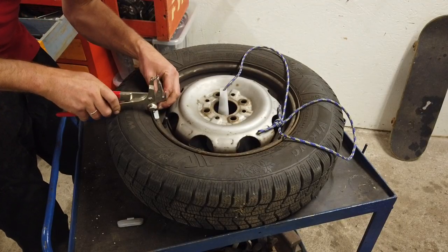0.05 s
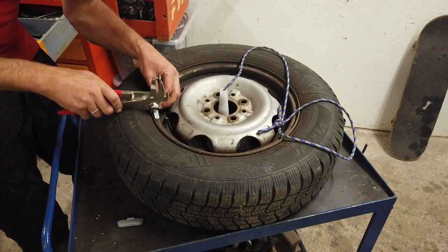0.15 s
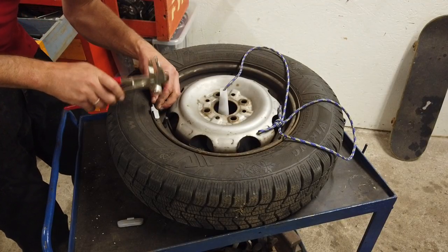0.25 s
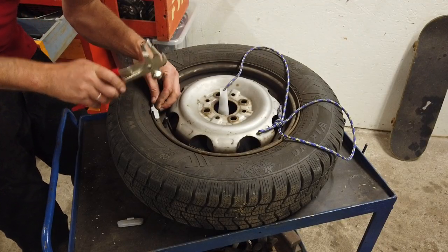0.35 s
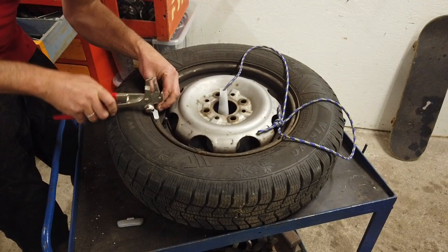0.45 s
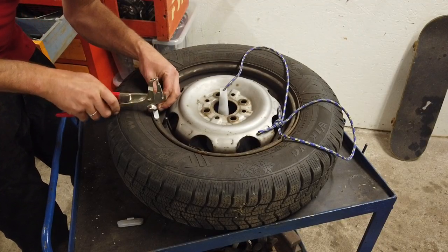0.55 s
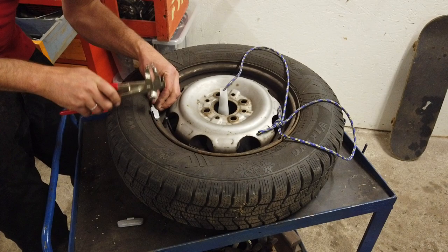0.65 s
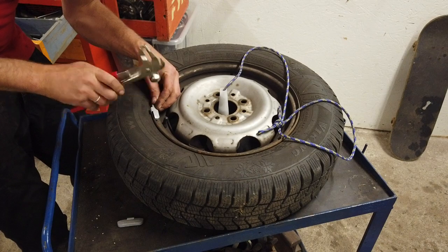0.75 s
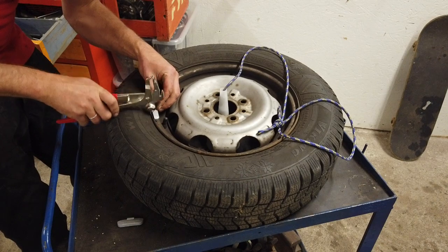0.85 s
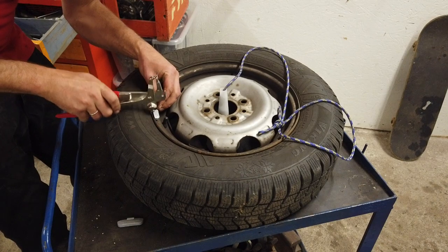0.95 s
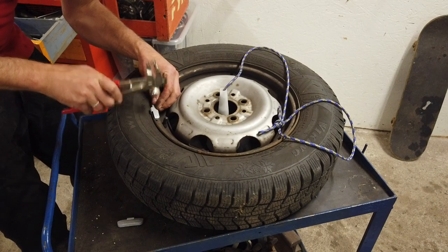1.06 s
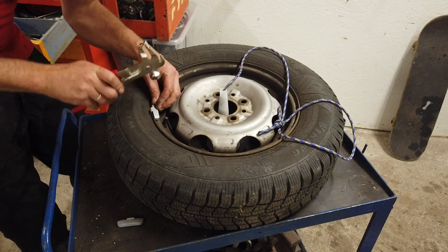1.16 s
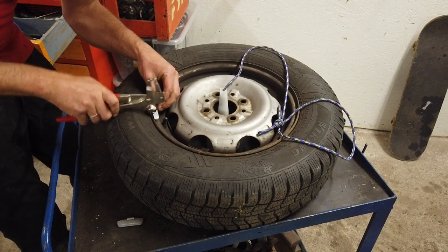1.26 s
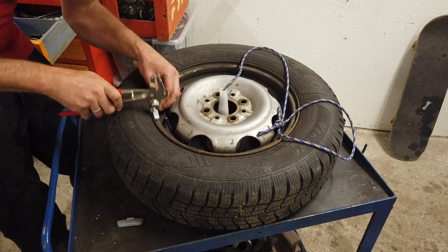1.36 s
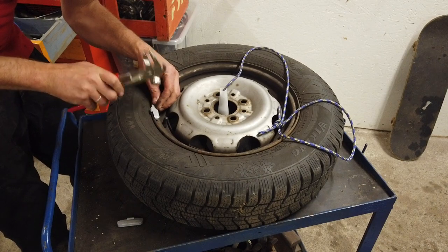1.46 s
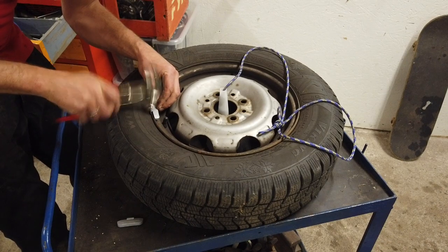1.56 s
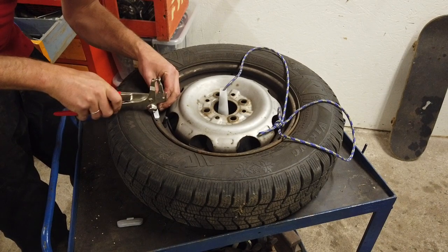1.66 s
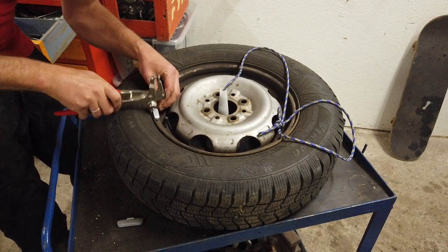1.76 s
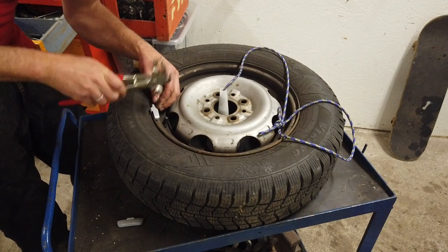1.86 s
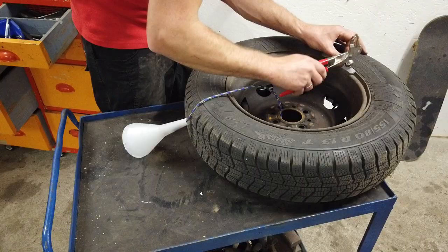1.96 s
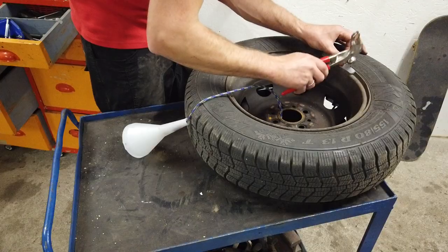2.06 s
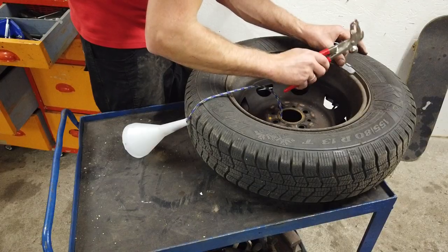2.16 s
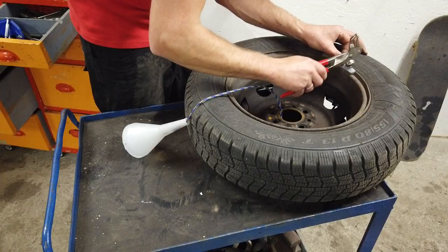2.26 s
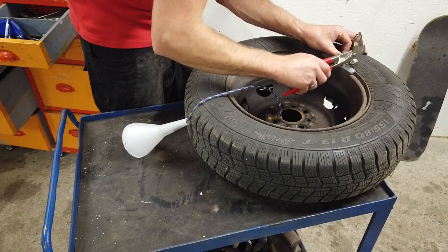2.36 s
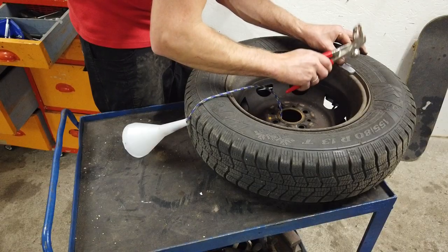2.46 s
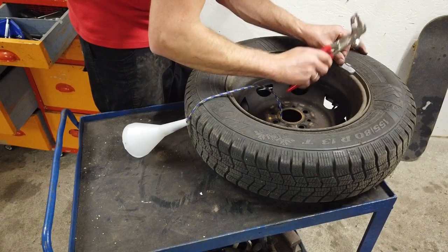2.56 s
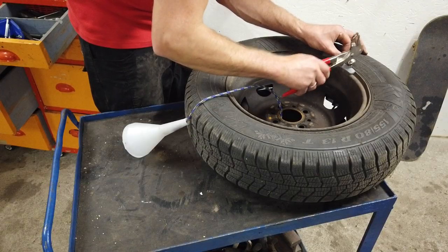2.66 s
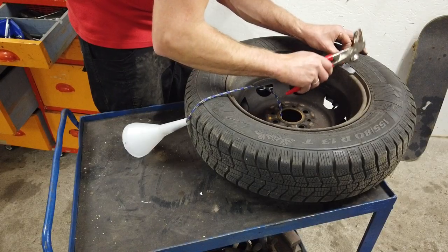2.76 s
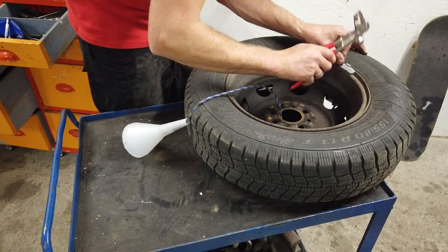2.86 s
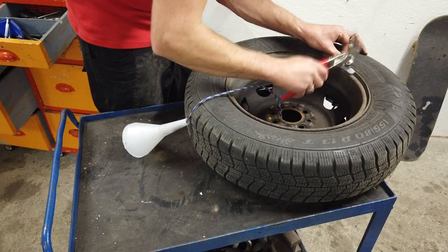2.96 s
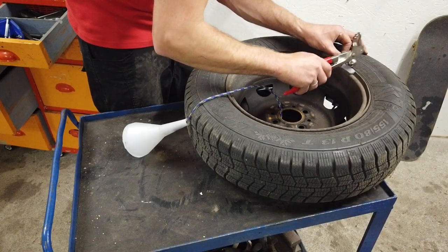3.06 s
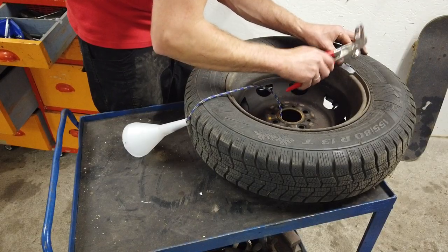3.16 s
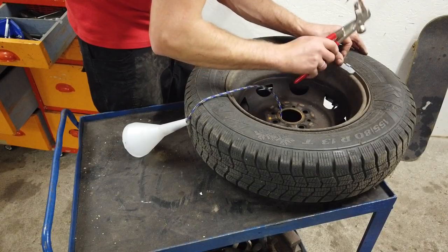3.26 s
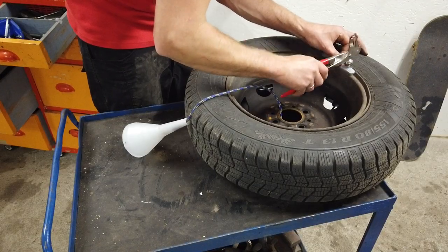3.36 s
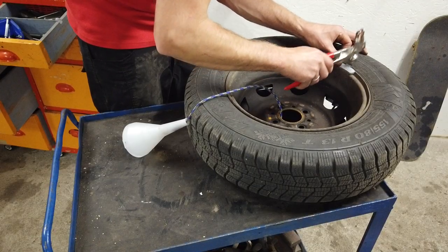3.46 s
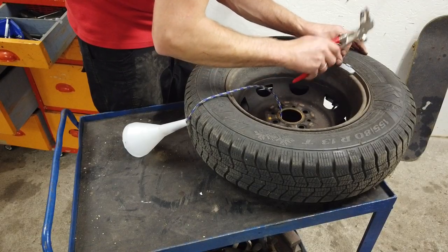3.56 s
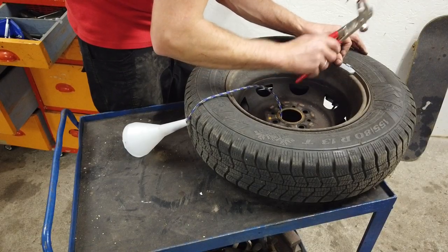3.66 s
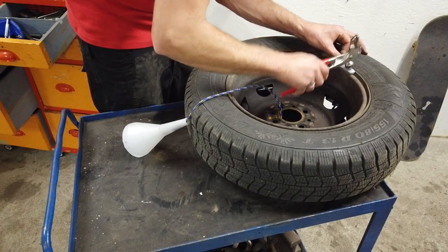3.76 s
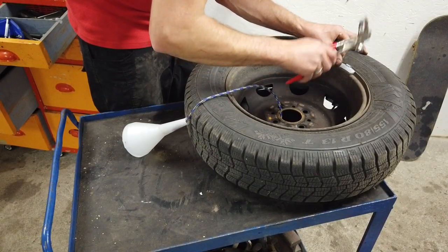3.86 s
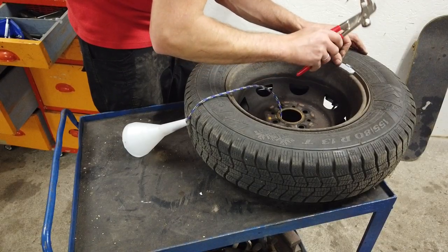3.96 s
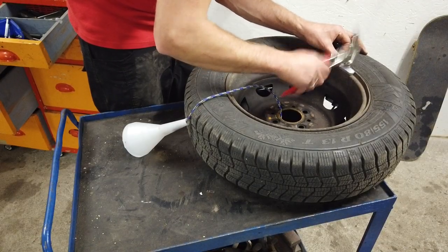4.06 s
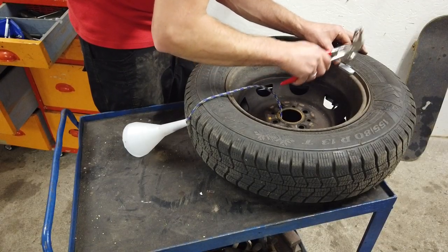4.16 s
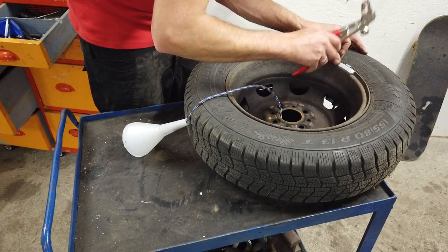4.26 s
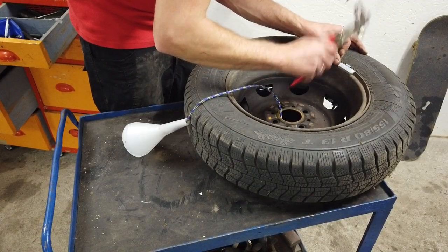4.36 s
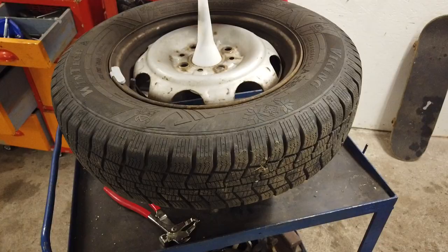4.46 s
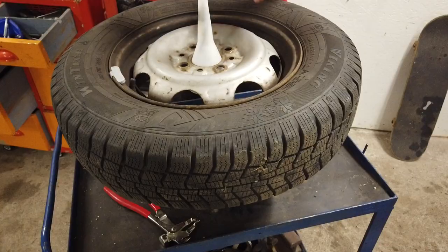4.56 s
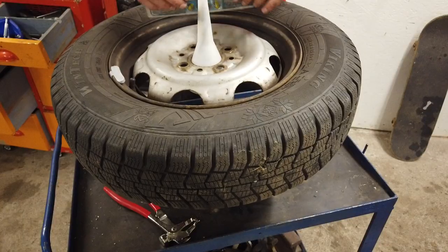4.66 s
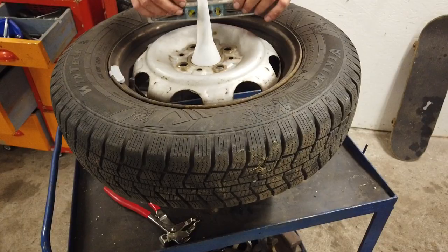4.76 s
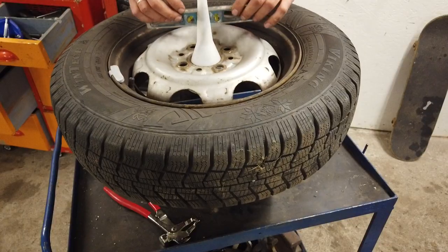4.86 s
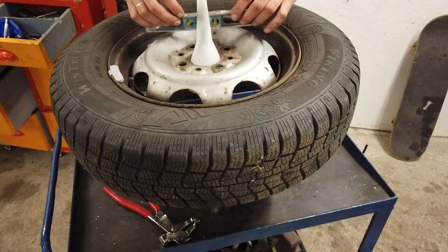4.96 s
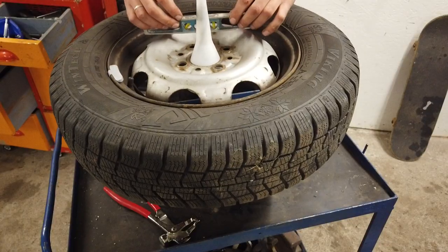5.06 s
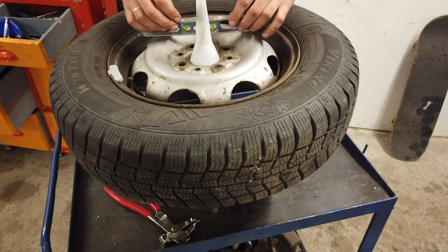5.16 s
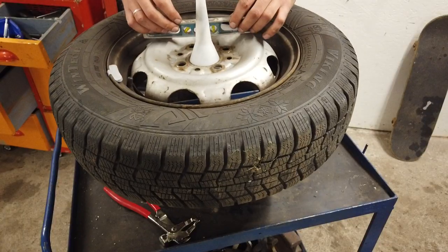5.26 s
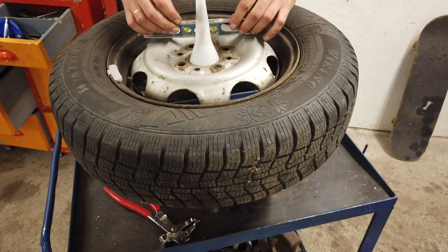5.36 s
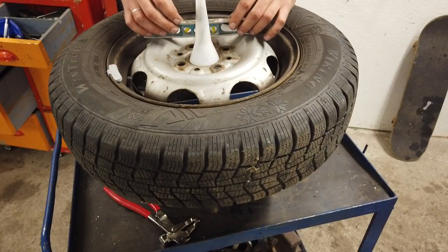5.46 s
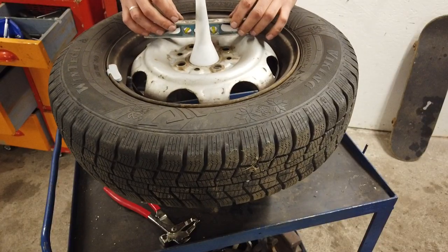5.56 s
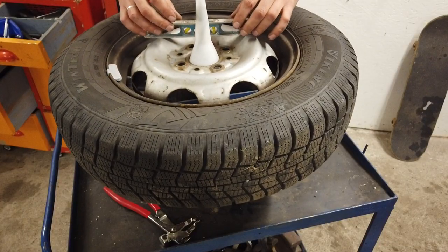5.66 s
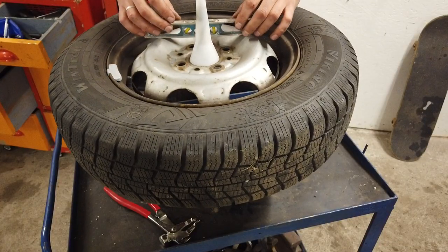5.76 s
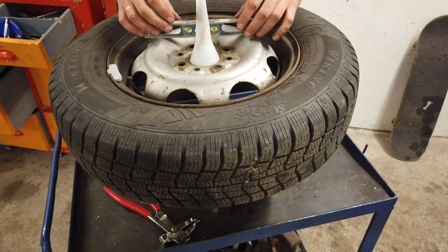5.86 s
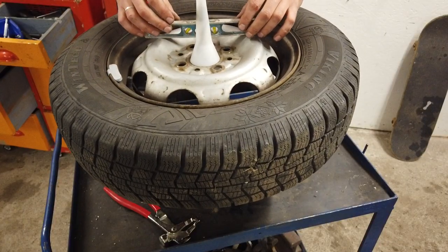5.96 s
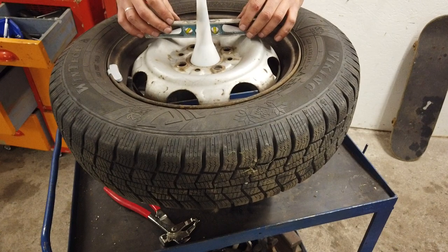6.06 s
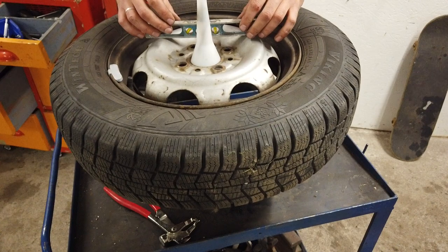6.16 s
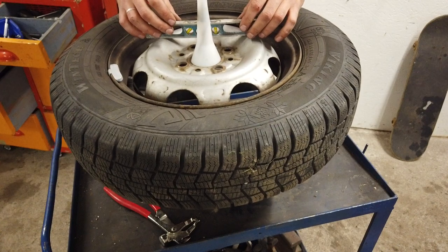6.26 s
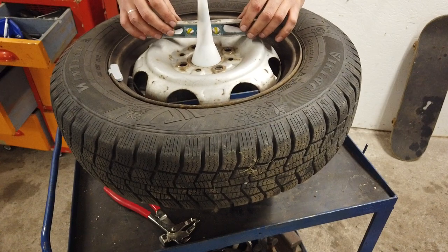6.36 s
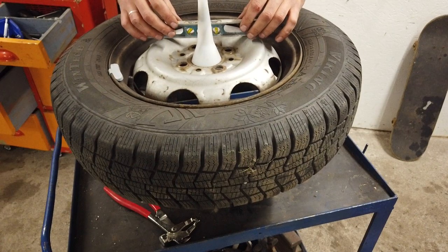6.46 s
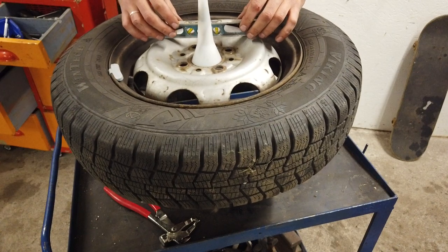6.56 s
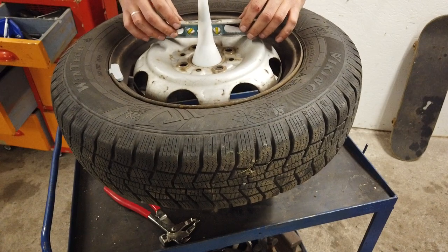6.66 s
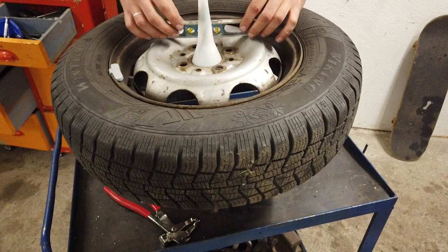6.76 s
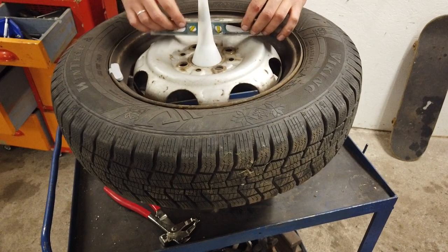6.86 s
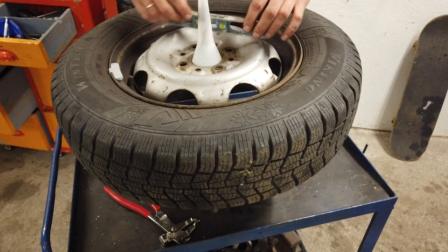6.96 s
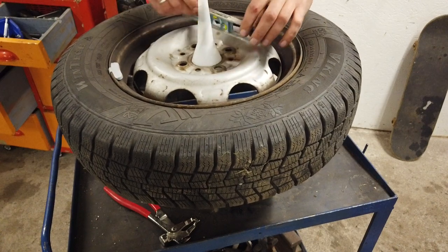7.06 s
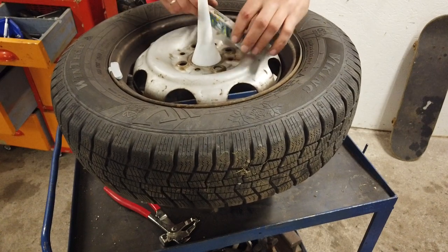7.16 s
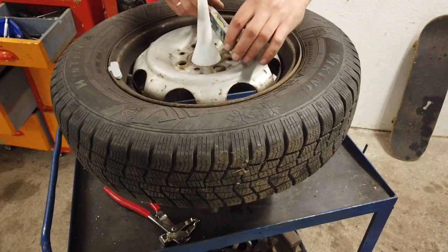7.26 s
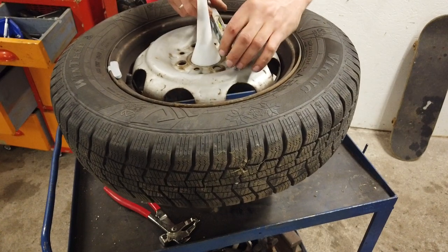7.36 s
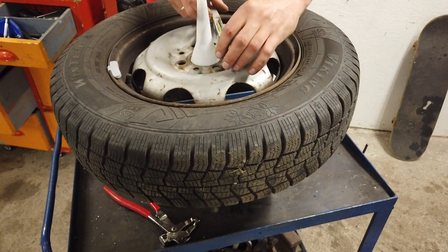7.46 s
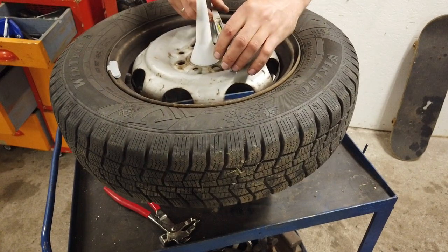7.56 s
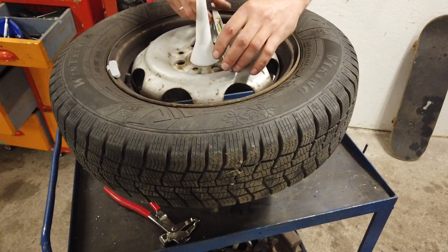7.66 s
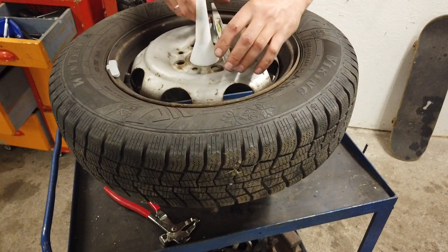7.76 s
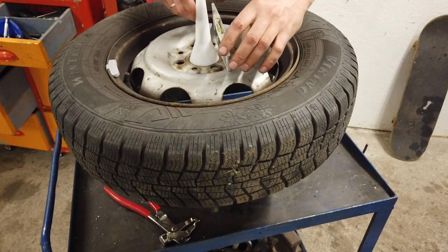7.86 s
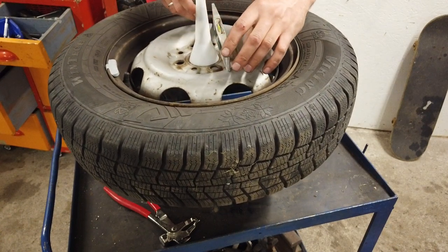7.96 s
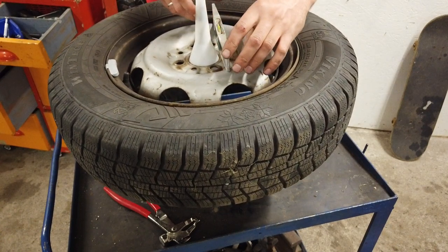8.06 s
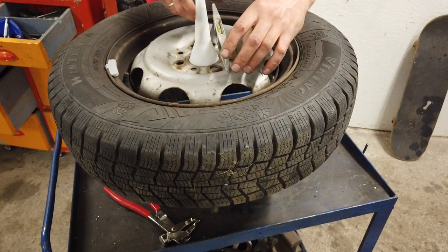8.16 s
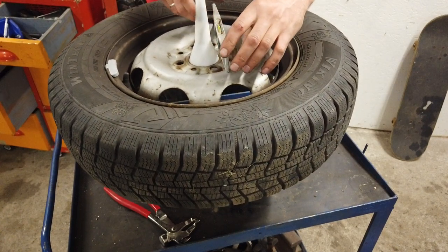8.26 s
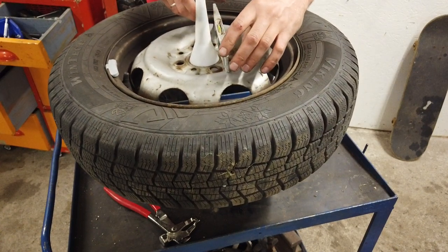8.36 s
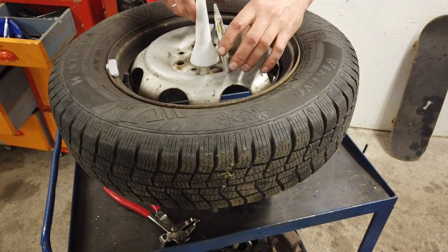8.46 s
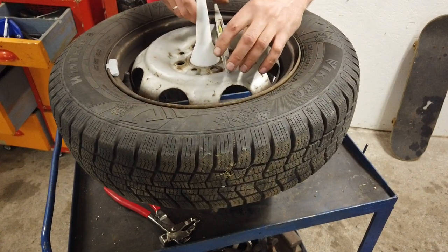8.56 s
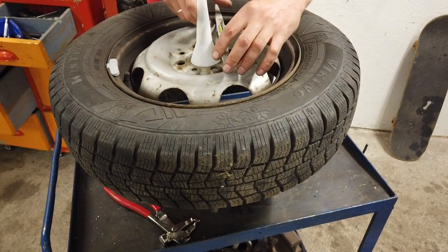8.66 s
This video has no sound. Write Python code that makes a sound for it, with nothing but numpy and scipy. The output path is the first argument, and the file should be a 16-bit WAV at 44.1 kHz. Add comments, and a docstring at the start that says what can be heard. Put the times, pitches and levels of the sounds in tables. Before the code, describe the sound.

Close recording in a small, briefly echoing garage with faint hiss and hum. From 0 to 2 seconds a plier hammer hits a weight on a steel wheel at about 0.15, 0.55, 0.95, 1.35 and 1.7: loud, hard clanks, slightly crushed by their loudness, with clattering rebounds and a short dull ring. A tiny scrape follows before the abrupt cut at 2.0. The wheel is now turned over; seven more blows come about every 0.35 seconds until 4.2, the first weaker, later ones strong, with a lower, boxier body. Another cut at 4.45 drops to quiet: soft brushing, a dull tap at 4.8 and thin high singing as a metal level slides. It clacks sharply in a quick cluster at 5.4 to 5.5, with dull settling bumps until 5.85. Near silence follows, a faint scuff at 7.0, then a double knock at 7.6 to 7.7 and only room tone.

```python
"""Balancing a steel wheel

In a garage, a plier hammer drives balance weights onto a wheel lying on a sheet-metal cart, then onto the wheel
turned over; last, a spirit level slides, is laid down and knocks on the hub. Three scenes are cut together.
Contacts are sums of decaying modes, dense clatter, a steel snap and a reverberant tail; rubbing is coloured noise
under swells; room tone is noise with hums. A close microphone softly clips the loudest blows."""
import sys
import numpy as np
from scipy import signal
from scipy.fft import rfft, irfft, next_fast_len
from scipy.io import wavfile
from scipy.ndimage import map_coordinates

SR = 44100
rng = np.random.default_rng(int(sys.argv[2]) if len(sys.argv) > 2 else 0)


def dump_mix(stems):
    """Bounce the given channels to the path in sys.argv[1] as a 16-bit WAV at rate SR."""
    frames = np.atleast_2d(stems).T  # one column per channel
    limited = np.clip(frames, -1, 1)  # hard clip at full scale
    pcm = np.round(limited * 32767).astype(np.int16)
    wavfile.write(sys.argv[1], SR, pcm)


N = 383621  # samples

# Boundaries between the three scenes: time_s
SCENE_CUTS = [1.971, 4.445]

# Room tone, relative spectrum: freq_hz, level_db
AIR_SPECTRUM = [(12, -36), (20, -15.5), (121, -10), (152, -5), (226, -14.5), (299, -7), (364, -12.5),
                (496, -11), (605, -13), (1370, -18), (1530, -16), (9000, -21), (13000, -27.5),
                (15000, -29.5), (16800, -36.5)]
# Steady hums, before a trim and a slow wavering: pitch_hz, level_db
HUM_TONES = [(100, -76), (151, -75), (202, -84.5), (300, -78.5)]
# Reverberation time of the garage: freq_hz, t60_s
GARAGE_DECAY = [(60, .6), (200, .42), (500, .37), (1100, .27), (3000, .285), (7000, .29), (12000, .235),
                (16000, .19)]
# Colour of the garage's answer: freq_hz, level_db
WALL_COLOUR = [(100, -5), (1000, 2), (3000, -1.5), (6000, -2), (12000, 2.5)]
# Microphone response: freq_hz, gain_db
MIC_RESPONSE = [(20, -8), (100, -1), (9000, -4), (13000, 1), (15600, -1.5), (16200, -19), (17000, -32)]
BAND_LIMIT_HZ = 17000

# Dull taps and clunks of the rocking wheel: start_s, level_db, pitch_hz, t60_s, tick_db
DULL_KNOCKS = [(1.62, -40.5, 770, .015, -21), (4.549, -50.5, 1160, 0.032, -15),
               (4.77, -28.5, 913, 0.013, -43), (5.575, -40, 546, 0.059, -30), (5.64, -40, 506, 0.039, -35),
               (5.811, -32, 1430, 0.017, -16), (5.814, -37.5, 309, 0.073, -30),
               (6.598, -55, 3570, .015, -9)]

# Low rumbles: a blow dying away, then the wheel rocking and settling:
# start_s, attack_s, hold_s, release_s, level_db
LOW_RUMBLES = [(1.95, .03, 0.094, .02, -56), (4.43, 0.021, 0.11, 0.038, -64.5),
               (5.54, 0.029, 0.27, 0.084, -54.5)]
# Swells of a low hum: start_s, attack_s, hold_s, release_s, level_db
LOW_HUMS = [(5.79, 0.018, .015, 0.11, -56), (5.83, 0.14, 0.014, 0.085, -49.5)]
# Hands and tools brushing over tyre and rim: start_s, attack_s, hold_s, release_s, level_db
BRUSH_STROKES = [(-.05, 0.027, 0.18, .03, -60), (4.42, 0.024, 0.033, 0.13, -61.5),
                 (4.53, 0.0426, 0.042, 0.15, -43), (6.57, 0.023, 0.0065, .12, -64.5)]
# Relative spectrum of brushing: freq_hz, level_db
BRUSH_SPECTRUM = [(59, -49), (100, -6.5), (320, 7), (497, -5), (527, -1.5), (1460, -4), (1590, -6.5),
                  (1980, -4.5), (3260, -0.5), (12000, -25), (15600, -65.5), (22000, -120)]
# The weight shifted along the rim: start_s, attack_s, hold_s, release_s, level_db
RIM_SCRAPES = [(1.605, .012, 0.011, 0.026, -52.5), (1.65, 0.014, 0.048, .01, -53.5),
               (1.96, 0.012, 0.1, .015, -54)]
# Rim resonances under a scrape: pitch_hz, width_hz, level_db
RIM_RESONANCES = [(800, 300, -0.5), (1600, 150, 0.5), (2000, 400, 0.5), (2500, 300, -2), (3100, 200, -5.5),
                  (3700, 250, -3), (4800, 300, -5.5)]
# The sliding level sings: start_s, attack_s, hold_s, release_s, low_line_db, upper_lines_db
SLIDE_SONGS = [(4.43, 0.019, 0.052, .08, -68, -62), (4.58, 0.03, 0.034, 0.18, -56, -63),
               (4.785, 0.019, 0.078, 0.076, -50.5, -61.5), (7.1, .04, 0.24, .12, -72, -88),
               (7.1, 0.04, .04, .1, -87.5, -67.5)]
# Upper lines of the singing: pitch_hz, width_hz, level_db
UPPER_LINES = [(6300, 140, 0), (6750, 120, -4), (8050, 200, -11)]
SWELL_DB = 30  # how far under its top a swell starts and ends

# Level against the hub: start_s, level_db, thud_db, bright_db, snap_db
HUB_KNOCKS = [(5.413, -16.5, -6.5, -12, -16), (5.468, -14, -1, 4, 11.5), (5.501, -29, -17, 1, -12),
              (7.602, -27, -2.5, -17, -30), (7.689, -10, -7, -11, -18), (7.693, -16.5, -6, -4.5, -2)]
# Modes of level and hub: pitch_hz, level_db, t60_s
LEVEL_MODES = [(342, -15, 0.072), (431.5, -6.5, 0.033), (542, -19.5, 0.065), (990, -31, 0.1),
               (1174, -11.5, 0.072), (1247, -8.5, 0.033), (1374, -21, 0.11), (1777, 0.5, 0.06),
               (2008, -9, 0.03), (2346, -17, 0.061), (2773, -13, 0.058), (3770, -51, 0.027),
               (5010, -33, 0.45), (5190, -8, 0.04), (6580, -27, 0.059), (7180, -31, 0.11)]
# Dense clatter of a knock, relative spectrum: freq_hz, level_db
KNOCK_SPECTRUM = [(60, -52), (300, -11), (1200, -4), (2500, -5.5), (5200, -1), (9000, -51), (16000, -29)]
# The level scuffs over the hub: start_s, attack_s, hold_s, release_s, low_modes_db, high_modes_db
HUB_SCUFFS = [(6.955, 0.036, .004, 0.042, -40, -54.5)]

# Hammer blows: start_s, level_db, thud_db (tyre and cart), bright_db (before dulling), snap_db
HAMMER_BLOWS = [(-.25, 2, 2, -5, 4), (.139, -4.5, 3, 6.5, 10), (.544, 2.5, -0.5, 1, -0.5),
                (.97, 1, -3, 1.5, 0.5), (1.349, 4.5, -1.5, 1.5, -2), (1.701, 2.5, -4, -0.5, -1.5),
                (2.093, -13, 6.5, 13, 13.5), (2.368, -6.5, 3.5, 11.5, 3.5), (2.741, -6, 0, 3.5, 17.5),
                (3.1, 1, -4.5, 4, 7.5), (3.482, 0.5, -3.5, 0, -16), (3.865, 1.5, -8, 0.5, 0),
                (4.204, 3, -9.5, 1, -0.5)]
# Tool and weight land again after a blow: start_s, level_db
HAMMER_REBOUNDS = [(.148, -4), (.158, -7), (.176, -10.5), (.186, -12.5), (0.211, -19), (.559, 0.5),
                   (.58, -13.5), (.618, -12.5), (.99, -4), (.998, -11.5), (1.009, -12.5), (1.365, -6),
                   (1.373, -4.5), (1.397, -10.5), (1.413, -9), (1.716, -9.5), (1.721, 2), (2.11, -16),
                   (2.121, -11), (2.377, -13.5), (2.442, -18), (2.754, -0.5), (2.818, -12.5), (3.175, -9.5),
                   (3.189, -18), (3.22, -29.5), (3.493, -7), (3.519, -8.5), (3.548, -14), (3.877, 1),
                   (3.919, -10), (4.244, -8.5), (4.257, -10.5)]
REBOUND_THUD_DB, REBOUND_BRIGHT_DB, REBOUND_SNAP_DB = -4, 1, -9.5  # brightness before dulling
BLOW_RISE_S, REBOUND_RISE_S = .0007, .001
DULLING = .6  # dB of treble lost per dB of weaker contact
# Modes of wheel, cart and tool: pitch_hz, face_up_db, face_down_db, t60_s
WHEEL_MODES = [(58, -38, -24, .6), (199, -16, -14, .35), (260, -8, -2, .3), (302, 0, -14, .22),
               (347, -5, -12, .18), (415, -14, -14, .45), (506, -16, -14, .4), (565, -6, -14, .17),
               (684, -7, -10, .18), (732, -16, -10, .2), (995, -16, -8, .18), (1042, -14, -2, .13),
               (1082, -6, -12, .15), (1131, -8, -16, .15), (1205, -14, -5, .14), (1350, -8, -9, .12),
               (1420, -8, -6, .12), (1616, -12, -14, .13), (1725, -8, -16, .12), (1935, -5, -12, .11),
               (2476, -15, -26, .25), (3208, -28, -20, .2), (4900, -24, -26, .16), (2159, -31, -38, .6),
               (2358, -30, -33, .45), (2756, -32, -34, .42), (3075, -31, -30, .45), (4740, -26, -30, .27),
               (5152, -40, -28, .38), (7900, -38, -30, .22)]
# Dense clatter with the wheel face up, relative spectrum: freq_hz, level_db
FACE_UP_SPECTRUM = [(18, -74.5), (30, -43.5), (130, -38.5), (235, -24), (314, -2.5), (506, -7.5), (694, -8),
                    (814, -22.5), (1380, -5), (1530, -15.5), (1890, -0.5), (2500, -9), (3380, -22.5),
                    (4770, -12.5), (7090, -30), (14100, -52), (16500, -67)]
# Dense clatter with the wheel face down, relative spectrum: freq_hz, level_db
FACE_DOWN_SPECTRUM = [(18, -58.5), (30, -28.5), (130, -20), (185, -18.5), (255, 4), (378, -6.5),
                      (600, -4.5), (752, -11.5), (835, -23), (1030, -5), (1120, -9.5), (1210, -4),
                      (2000, -9), (2280, -11.5), (6210, -16.5), (15200, -54.5), (16500, -67)]
# Decay of the hammer's clatter: freq_hz, t60_s
CLATTER_DECAY = [(60, .15), (300, .06), (1200, 0.027), (2200, 0.015), (4000, .02), (12000, 0.016)]
PAIR_SPLIT = .0026  # spread of paired modes, as a share of their pitch


def amp(db):
    """Decibels are the logarithm of an amplitude ratio."""
    return 10 ** (np.asarray(db) / 20)


def unit(x):
    """Normalisation brings the root-mean-square to 1."""
    return x / np.sqrt(np.mean(x ** 2) + 1e-20)


def along(points, hz):
    """Interpolation of a (freq_hz, value) curve on a logarithmic frequency axis."""
    freq_hz, value = np.transpose(points)
    return np.interp(np.log(hz + 1), np.log(freq_hz + 1), value)


def filtered(x, response):
    """Linear filtering multiplies the spectrum by a response of frequency."""
    size = next_fast_len(N + SR // 2)
    hz = np.fft.rfftfreq(size, 1 / SR)
    return irfft(rfft(x, size) * response(hz), size)[:N]


def noise(colour):
    """White noise shaped by a gain per frequency, at rms 1."""
    return unit(filtered(rng.standard_normal(N), colour))


def wobble(rate_hz):
    """A smooth random curve through independent knots, rate_hz of them a second."""
    knots = rng.standard_normal(int(N * rate_hz / SR) + 4)
    return map_coordinates(knots, [np.arange(N) * rate_hz / SR])


def band(hz, centre_hz, width_hz):
    """A single resonance passes its centre and falls off on both sides."""
    return 1 / np.abs(1 + 2j * (hz - centre_hz) / width_hz)


def resonances(hz, rows):
    """Superposition of squared resonance gains, from rows of pitch_hz, width_hz, level_db."""
    return sum(amp(db) * band(hz, pitch_hz, width_hz) ** 2 for pitch_hz, width_hz, db in rows)


def swells(rows, column=4):
    """Exponential growth and decay of amplitude: straight lines in dB around a hold."""
    t, gain = np.arange(N) / SR, np.zeros(N)
    for row in rows:
        corners_s = row[0] + np.cumsum([0, *row[1:4]])
        shape = np.interp(t, corners_s, [-1, 0, 0, -1], -np.inf, -np.inf)  # silent outside the swell
        gain += amp(row[column] + SWELL_DB * shape)
    return gain


def dying(size, colour_db, decay):
    """Frequency-dependent damping: noise in which each frequency dies at its own speed."""
    hz, t, z = signal.stft(rng.standard_normal(size), SR, nperseg=256)
    fall_db = 60 * t / along(decay, hz)[:, None]
    gain = amp(colour_db(hz)[:, None] - fall_db)
    return signal.istft(z * gain, SR, nperseg=256)[1][:size]


def garage(dry):
    """Reverberation is convolution with a decaying noise tail, drawn anew for every sound."""
    tail = dying(len(dry), lambda hz: along(WALL_COLOUR, hz), GARAGE_DECAY)
    tail = tail / np.linalg.norm(tail)
    return signal.fftconvolve(dry[:len(dry) // 4], tail)[:len(dry)]


def add(track, start_s, sound):
    """Superposition of a sound on a track, cut off at the next scene boundary."""
    end = min([round(c * SR) for c in SCENE_CUTS if c > start_s] + [N])
    start = round(start_s * SR)
    sound = sound[max(-start, 0):end - start]
    track[max(start, 0):][:len(sound)] += sound


def contact(modes, spectrum, decay, thud_db, bright_db, snap_db, ring_db, clatter_db, wet_db,
            beating, scatter_db, rise_s):
    """Impact excitation: modes at new strengths, dense clatter, a steel snap, and the garage's answer."""
    t = np.arange(SR // 2) / SR

    def tilt_db(hz):
        return along([(500, thud_db), (900, 0), (2500, 0.0078), (4000, bright_db)], hz)

    hz, db, t60_s = np.transpose(modes)[:, :, None]
    split, phase, scatter = rng.standard_normal((3, len(hz), 1))
    # round parts have their modes in close pairs, which beat
    beat = 1 + beating * np.sin(2 * np.pi * (PAIR_SPLIT * hz * split * t + phase))
    mode_db = db + tilt_db(hz) + scatter_db * scatter - 60 * t / t60_s
    ring = np.sum(amp(mode_db) * beat * np.sin(2 * np.pi * hz * t), axis=0)
    ring *= 1 - np.exp(-t / rise_s)

    clatter = dying(len(t), lambda f: along(spectrum, f) + tilt_db(f), decay)
    clatter = clatter * np.sin(np.pi / 2 * np.clip(2 * t / rise_s, 0, 1)) ** 2

    burst = amp(snap_db - 60 * t / 0.013) * rng.standard_normal(len(t))
    snap = signal.sosfilt(signal.butter(2, [4000, 6800], "band", fs=SR, output="sos"), burst)

    dry = amp(ring_db) * ring + amp(clatter_db) * clatter + snap
    return dry + amp(wet_db) * garage(dry)


def room_tone():
    """Stationary noise with faint wavering sinusoids, fainter in the two hammering scenes."""
    t = np.arange(N) / SR
    hums = sum(amp(db - 2.5 + 2.5 * wobble(5)) * np.sin(2 * np.pi * hz * t) for hz, db in HUM_TONES)
    air = noise(lambda hz: amp(along(AIR_SPECTRUM, hz)))
    air = amp(-66.5 + 0.48 * wobble(3)) * air
    return (air + hums) * np.where(t < SCENE_CUTS[1], amp(-6.5), 1)


def dull_knocks():
    """Heavy damping: one short mode, roughened by noise, with a tick on top."""
    out, t = np.zeros(N), np.arange(SR // 4) / SR
    for start_s, db, hz, t60_s, tick_db in DULL_KNOCKS:
        roughness = 1 + 0.11 * rng.standard_normal(len(t))
        body = amp(-60 * t / t60_s) * np.sin(2 * np.pi * hz * t) * roughness
        tick = amp(tick_db - 60 * t / 0.019) * rng.standard_normal(len(t))
        knock = body + tick
        add(out, start_s, amp(db) * (knock + amp(-6.5) * garage(knock)))
    return out


def low_rumbles():
    """Low resonance: a band of noise rumbles, and a sinusoid hums with a wandering phase."""
    t = np.arange(N) / SR
    rumble = noise(lambda hz: band(hz, 460, 190) ** 2)
    hum = np.sqrt(2) * np.sin(2 * np.pi * 316 * t + .5 * wobble(42))
    return rumble * swells(LOW_RUMBLES) + hum * swells(LOW_HUMS)


def brushing():
    """Friction on tyre and rim: broad noise made grainy by random modulation."""
    grains = noise(lambda hz: amp(along(BRUSH_SPECTRUM, hz))) * amp(1.7 * wobble(120))
    return unit(grains) * swells(BRUSH_STROKES)


def rim_scrapes():
    """Friction-driven resonance: the shifted weight excites the rim with grainy noise."""
    grains = noise(lambda hz: resonances(hz, RIM_RESONANCES)) * amp(3 * wobble(150))
    return unit(grains) * swells(RIM_SCRAPES)


def singing_level():
    """Rubbing excites thin metal lines: narrow bands of noise that swell and fade."""
    low_line = noise(lambda hz: band(hz, 5003, 45) ** 2)
    upper_lines = noise(lambda hz: resonances(hz, UPPER_LINES))
    return low_line * swells(SLIDE_SONGS) + upper_lines * swells(SLIDE_SONGS, column=5)


def spirit_level():
    """Modal ringing: light knocks ring the aluminium bar briefly; a scuff drives resonances with noise."""
    out = np.zeros(N)
    for start_s, db, thud_db, bright_db, snap_db in HUB_KNOCKS:
        sound = contact(LEVEL_MODES, KNOCK_SPECTRUM, [(300, 0.12), (5000, 0.037)], thud_db, bright_db, snap_db,
                        ring_db=2.0, clatter_db=-1, wet_db=-13.5, beating=.1, scatter_db=1.5, rise_s=.001)
        add(out, start_s, amp(db) * sound)
    # the scuff flattens the level differences between the low modes
    low_modes = [(hz, 64, 0.29 * db) for hz, db, _ in LEVEL_MODES if hz < 2000]
    low = noise(lambda hz: resonances(hz, low_modes))
    high = noise(lambda hz: resonances(hz, [(5150, 600, 0), (6800, 200, -8)]))
    return out + low * swells(HUB_SCUFFS) + high * swells(HUB_SCUFFS, column=5)


def hammer():
    """Modal excitation: turning the wheel over changes which modes speak; weaker contacts are duller."""
    out, table = np.zeros(N), np.array(WHEEL_MODES)
    blows = [(*row, BLOW_RISE_S) for row in HAMMER_BLOWS]
    rebounds = [(start_s, db, REBOUND_THUD_DB, REBOUND_BRIGHT_DB, REBOUND_SNAP_DB, REBOUND_RISE_S)
                for start_s, db in HAMMER_REBOUNDS]
    for start_s, db, thud_db, bright_db, snap_db, rise_s in blows + rebounds:
        face_down = start_s > SCENE_CUTS[0]
        modes = table[:, [0, 2 if face_down else 1, 3]]
        spectrum = FACE_DOWN_SPECTRUM if face_down else FACE_UP_SPECTRUM
        sound = contact(modes, spectrum, CLATTER_DECAY, thud_db, bright_db + DULLING * db, snap_db,
                        ring_db=-13.0, clatter_db=17.5, wet_db=-6.0, beating=.4, scatter_db=2, rise_s=rise_s)
        add(out, start_s, amp(db) * sound)
    # the blows carry little deep bass
    return signal.sosfilt(signal.butter(1, 160, "high", fs=SR, output="sos"), out)


def scene():
    """Superposition of all sources, with a short fade out and in at each cut."""
    t = np.arange(N) / SR
    fades = np.prod([np.clip(np.abs(t - c) / 0.0056, 0, 1) for c in SCENE_CUTS], axis=0)
    handling = low_rumbles() + brushing() + rim_scrapes() + singing_level()
    return (fades * (room_tone() + dull_knocks() + handling + spirit_level() + hammer()))[None]


def record(dry):
    """Saturation flattens the blows; the response then weakens the top treble up to the band limit."""
    top, hardness = 1.05, 4
    clipped = dry[0] / (1 + np.abs(dry[0] / top) ** hardness) ** (1 / hardness)
    return filtered(clipped, lambda hz: amp(along(MIC_RESPONSE, hz)) * (hz < BAND_LIMIT_HZ))[None]


dry = scene()
out = record(dry)
dump_mix(out)
```